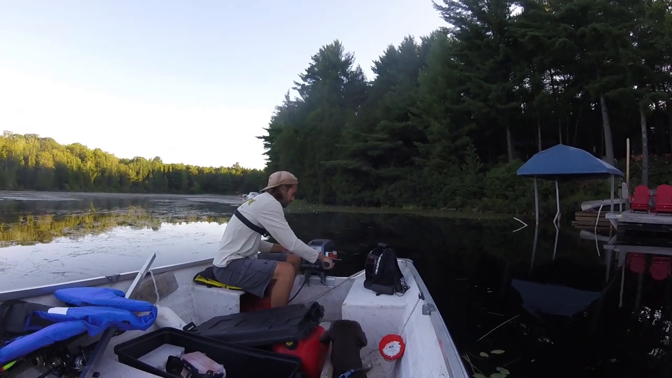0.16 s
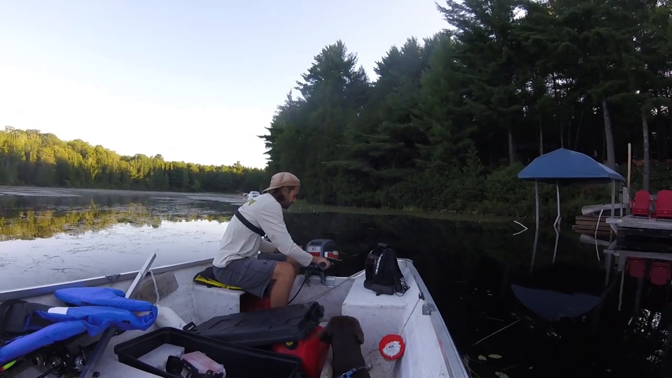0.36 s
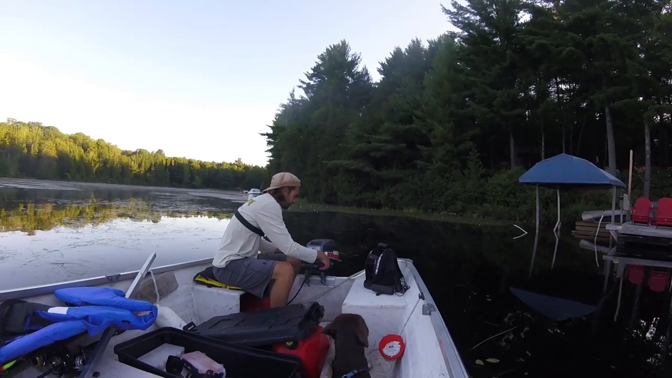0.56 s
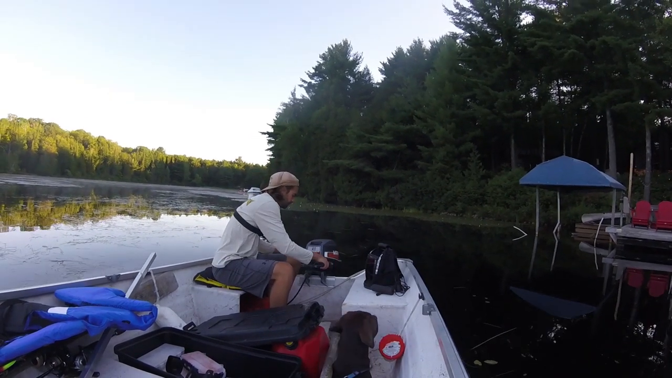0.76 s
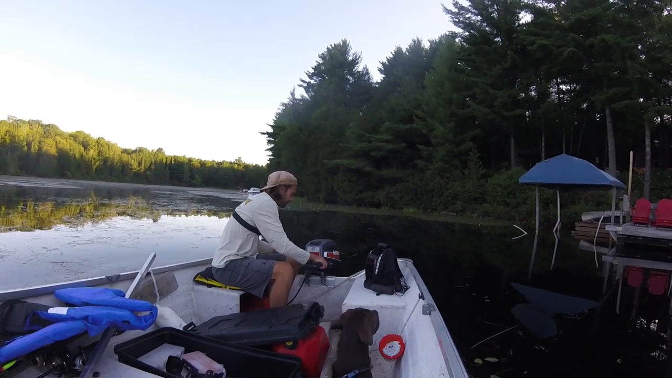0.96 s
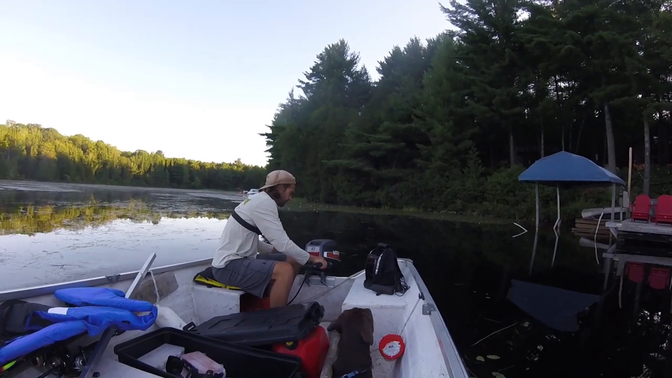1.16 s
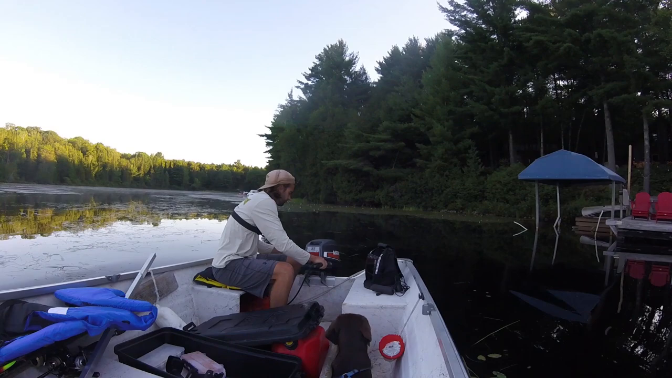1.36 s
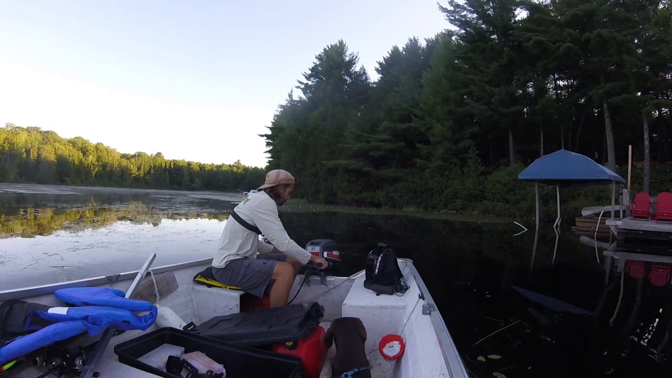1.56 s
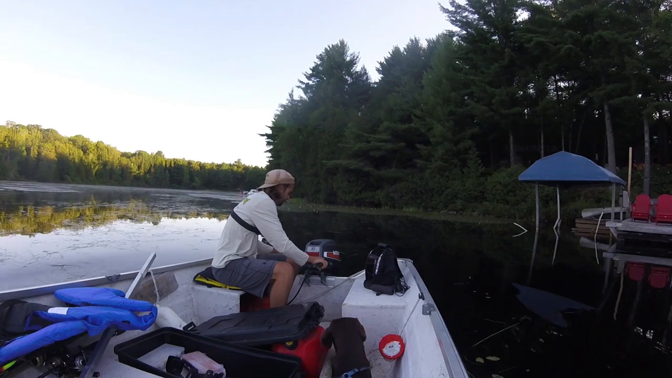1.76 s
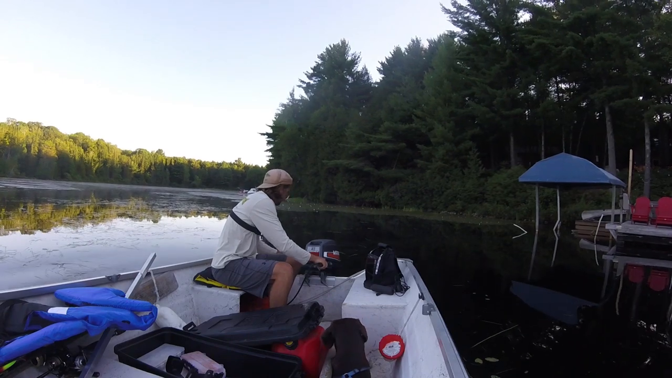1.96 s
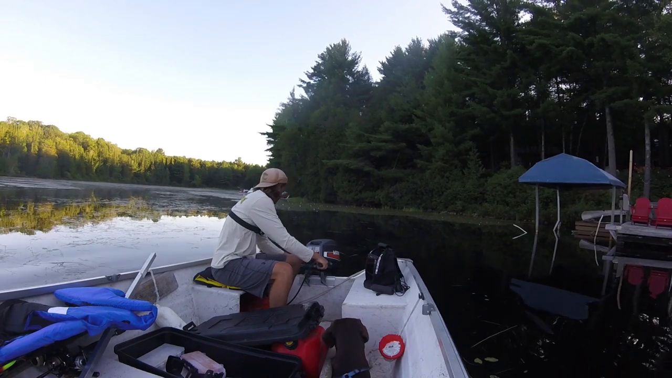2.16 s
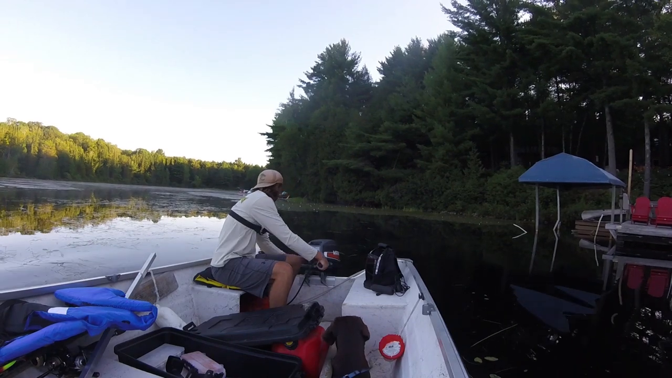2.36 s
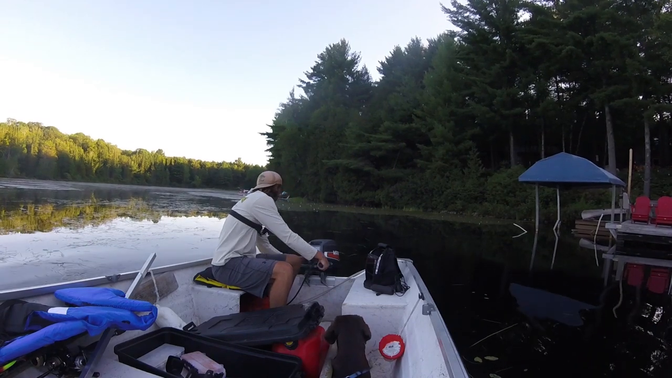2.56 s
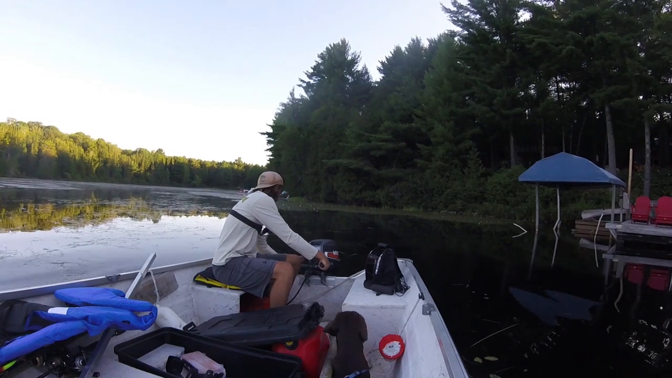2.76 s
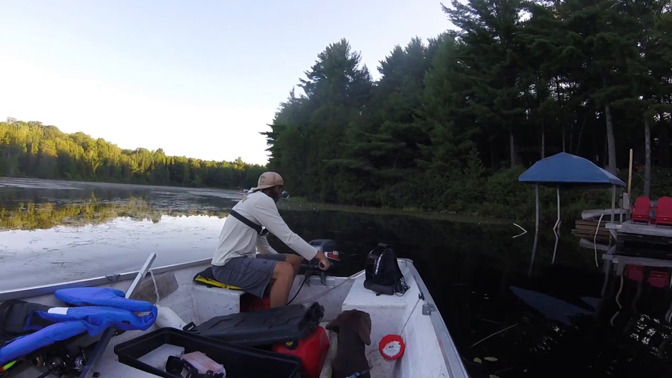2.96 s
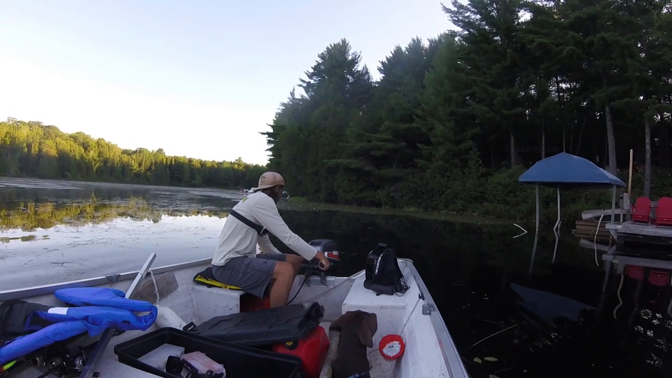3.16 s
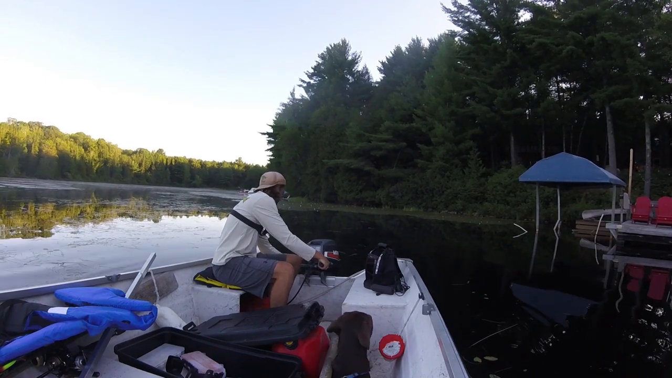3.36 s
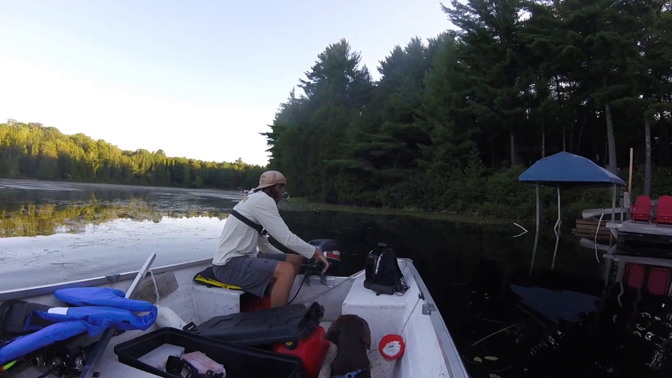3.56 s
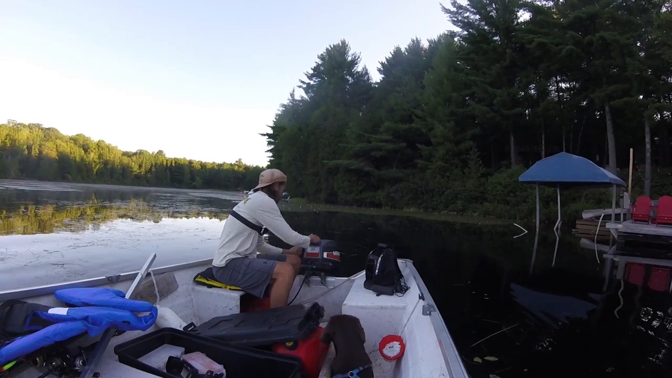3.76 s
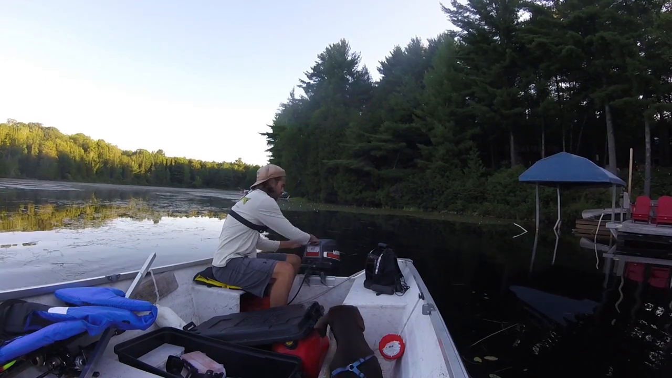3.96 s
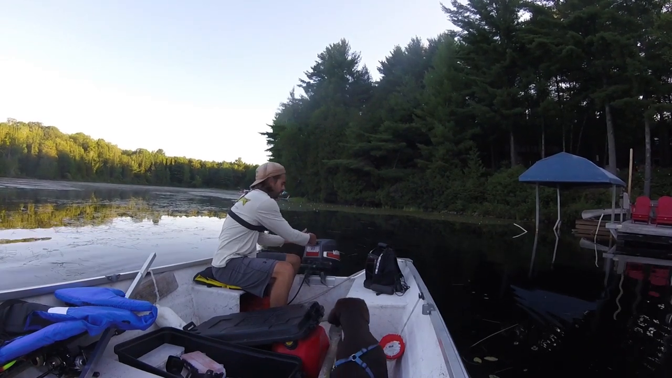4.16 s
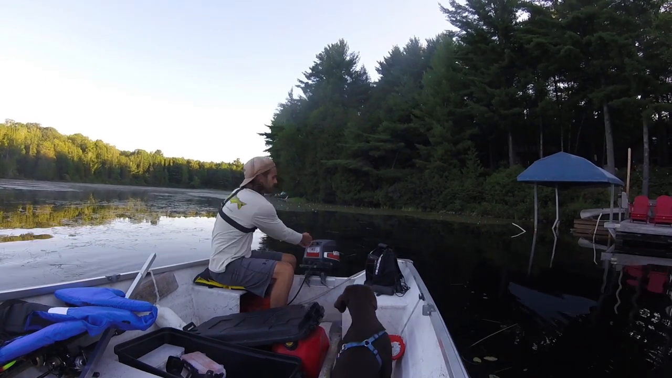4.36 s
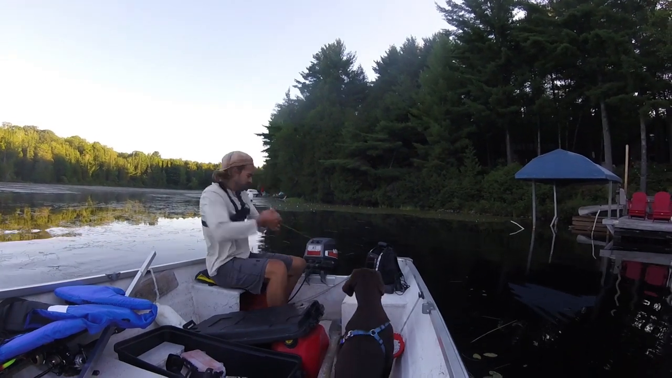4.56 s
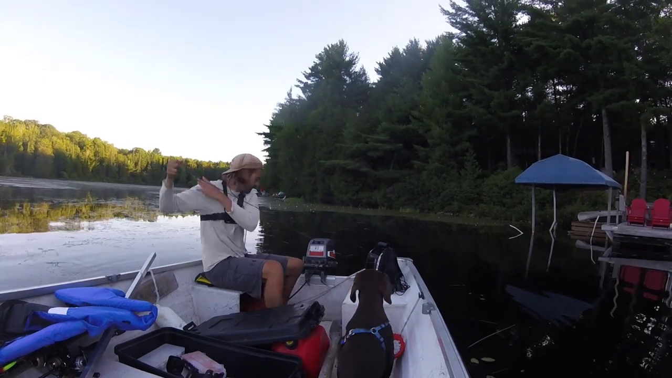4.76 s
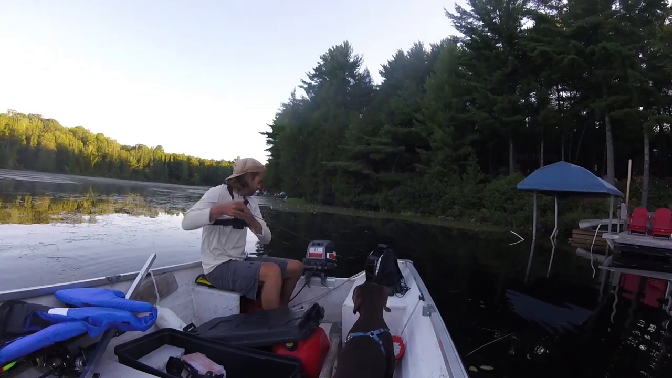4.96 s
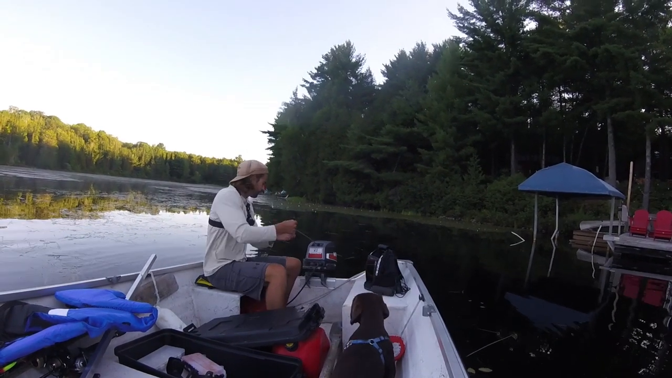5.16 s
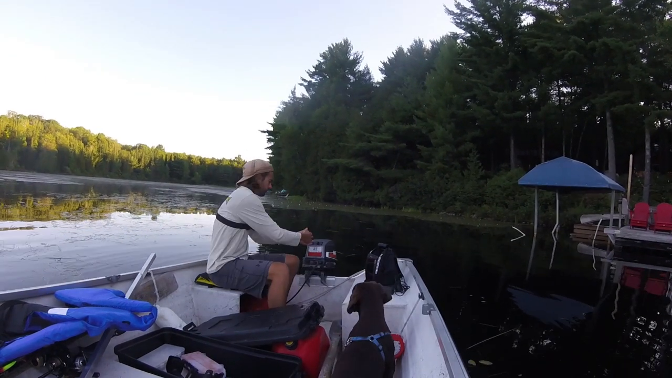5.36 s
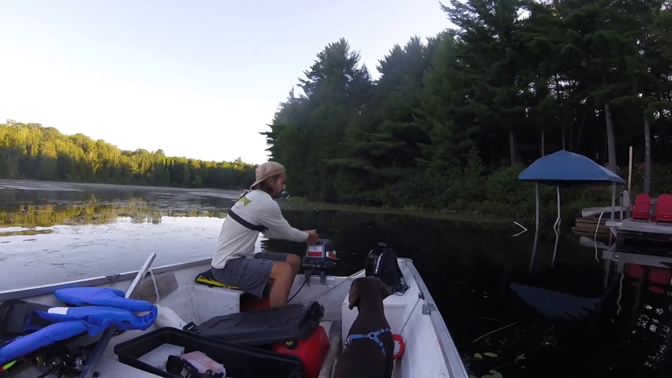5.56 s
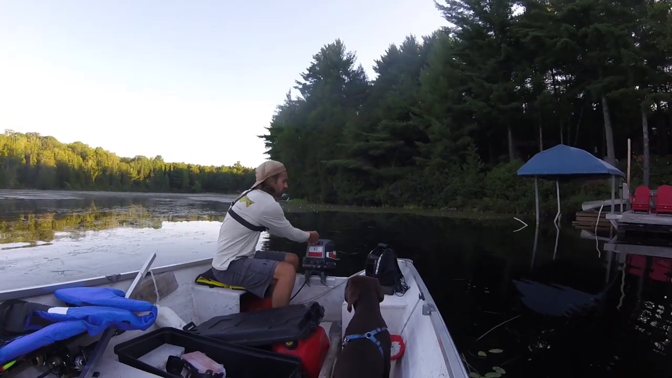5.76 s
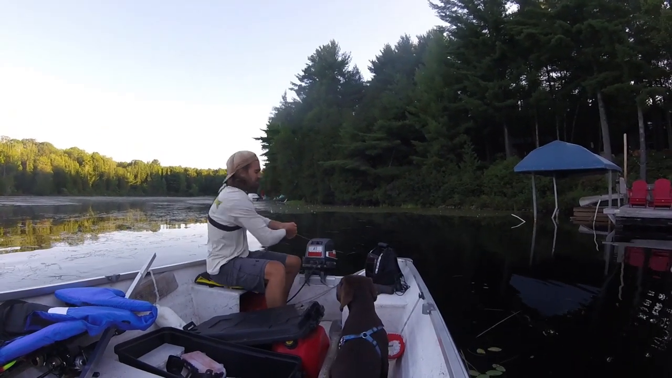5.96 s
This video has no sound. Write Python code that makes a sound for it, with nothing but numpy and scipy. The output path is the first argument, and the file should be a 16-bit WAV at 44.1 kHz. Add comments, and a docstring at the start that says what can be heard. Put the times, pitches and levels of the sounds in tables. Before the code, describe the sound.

Handling of a small outboard in an aluminium boat: a metallic knock, quiet pauses with soft ticks, a burst of crisp clacks, scuffs and low thumps. Then one fierce cord pull, ratcheting and rasping, with hollow engine gasps fading within half a second. Light rattles and closing knocks follow. The water barely murmurs; the housed microphone has thin bass, muted extreme top and steady soft hiss.

```python
"""A small outboard on an aluminium boat: knocks on motor and hull, noise and sines ringing in metal modes.
The cord is drawn out, then yanked: rasp of coloured clicks, gliding squeak, starter clatter, flywheel whirr.
The engine wheezes in uneven puffs, as paired intake tones, and stops; the cord winds back.
Scuffs, rattles and thuds are resonant noise, a loose part chimes as a thin sine, the calm lake murmurs.
A boxed-in microphone on the bow hears it with less deep bass, a cut top and its own hiss."""
import sys
import numpy as np
from scipy import signal
from scipy.fft import rfft, irfft
from scipy.io import wavfile
from scipy.ndimage import uniform_filter1d

SR = 44100
rng = np.random.default_rng(int(sys.argv[2]) if len(sys.argv) > 2 else 0)


def wav_out(sig):
    """Save sig, one row per channel (or a flat mono array), as 16-bit PCM at SR to the path in sys.argv[1]."""
    wavfile.write(sys.argv[1], SR, np.round(np.clip(np.atleast_2d(sig).T, -1, 1) * 32767).astype(np.int16))


N = 269010
T = np.arange(N) / SR

# cord, starter and shifting weight, as breakpoints: time_s, rasp_db, rumble_db
WORK_LEVELS = [(0.0, -52.5, -55), (.2, -51, -56), (.3, -58, -47.5), (.42, -64.5, -63), (1.7, -64.5, -64),
               (2.77, -61.5, -59), (3.57, -64.5, -59.5), (3.97, -55, -56), (4.2, -53.5, -49),
               (4.4, -46, -55.5), (4.54, -44.5, -44), (4.79, -31.5, -31.5), (5.03, -35, -34.5),
               (5.11, -43, -38.5), (5.4, -53, -50), (5.66, -49, -48.5), (5.86, -48.5, -55),
               (5.96, -43.5, -46), (6.1, -48.5, -42)]


def undb(db):
    """Decibels to amplitude."""
    return 10 ** (np.asarray(db) / 20)


def unit(x):
    """Scale to rms 1."""
    return x / np.sqrt(np.mean(x ** 2))


def colour(x, table):
    """Shape the spectrum of x by (Hz, dB) points joined on a log frequency axis; rms 1."""
    hz, db = np.transpose(table)
    bin_hz = np.maximum(np.arange(N // 2 + 1) * SR / N, 1)
    gain = undb(np.interp(np.log(bin_hz), np.log(hz), db))
    return unit(irfft(rfft(x) * gain, N))


def walk(rate):
    """Random levels held 1 / rate s and slewed twice; rms 1."""
    hold = int(SR / rate)
    steps = np.repeat(rng.standard_normal(N // hold + 1), hold)
    slewed = uniform_filter1d(uniform_filter1d(steps, hold), hold)
    return unit(slewed[:N])


def grit(share, spread_db):
    """Noise in which a share of the samples are clicks of widely spread size."""
    clicks = rng.random(N) < share
    sizes = undb(spread_db * rng.exponential(size=N))
    return clicks * sizes * rng.standard_normal(N)


def swell(centre, half):
    """A smooth bump in time, zero beyond half a length either side of its centre (s)."""
    return np.cos(np.pi / 2 * np.clip((T - centre) / half, -1, 1)) ** 2


def ringing(hz, width, count):
    """Noise through one resonance applied twice, so its skirts are steep; rms 1."""
    b, a = signal.iirpeak(hz, hz / width, SR)
    once = signal.lfilter(b, a, rng.standard_normal(count))
    return unit(signal.lfilter(b, a, once))


def lake():
    """Water laps at the hull: a low noise murmur whose level stirs."""
    # murmur spectrum: freq_hz, relative_db
    murmur_spectrum = [(15, -47), (25, -9.5), (146, -0.5), (189, -3.5), (321, -3), (356, -3), (437, -4),
                       (1500, -22), (1950, -54), (3300, -120)]
    murmur = colour(rng.standard_normal(N), murmur_spectrum)
    return murmur * undb(-63.5 + 1.4 * walk(12))


def cord_rasp():
    """The cord rasps in slips: dense clicks of uneven size, coloured and flickering in level."""
    # rasp spectrum: freq_hz, relative_db
    rasp_spectrum = [(260, -12), (450, 0), (694, 1.5), (809, -1), (1460, -5.5), (1870, -5.5), (2600, -19.5),
                     (3380, -61), (5720, -120)]
    time_s, rasp_db, _ = np.transpose(WORK_LEVELS)
    level_db = np.interp(T, time_s, rasp_db) + 0.99 * walk(60)
    return colour(grit(0.3, 1.77), rasp_spectrum) * undb(level_db)


def hull_rumble():
    """The hull rumbles under the shifting weight: low noise with an unsteady level."""
    # rumble spectrum: freq_hz, relative_db
    rumble_spectrum = [(15, -48), (25, -11.5), (87, -9), (173, -7), (277, -4.5), (366, -7.5), (450, -12.5),
                       (580, -25), (990, -120)]
    time_s, _, rumble_db = np.transpose(WORK_LEVELS)
    level_db = np.interp(T, time_s, rumble_db) + 1.4 * walk(24.99)
    return colour(rng.standard_normal(N), rumble_spectrum) * undb(level_db)


def flywheel_whirr():
    """The flywheel whirrs with the cord: bright sparse clicks on the rasp's level curve."""
    lead_s, below_rasp_db, surge_db = 0.025, -12.5, 3
    spectrum = [(1500, -2.5), (2600, 5.0), (4800, 0.5), (6500, -2.5), (11000, -8.5), (13000, -55)]
    time_s, rasp_db, _ = np.transpose(WORK_LEVELS)
    # the level curve runs slightly ahead of the rasp, so the whirr fades a little sooner
    level_db = np.interp(T + lead_s, time_s, rasp_db) + below_rasp_db
    level_db = level_db + surge_db * swell(4.82, 0.23)  # at full speed
    return colour(grit(0.1, 1.3), spectrum) * undb(level_db + 2.0 * walk(80))


def loudest(x):
    """The highest short-term rms, over 5 ms."""
    return np.sqrt(uniform_filter1d(x ** 2, size=220).max())


def knocks():
    """Every blow strikes the same modes; loose parts chatter, so each mode rings rough and leaves a tail."""
    # knocks with their own ring time and a bright top, on the motor, the hull and in the starter:
    # start_s, clack_db, thump_db, tick_db, clack_pitch_hz, thump_pitch_hz,
    # ring_s (to -60 dB, before each register's share)
    bright_blows = [(0.0867, -20, -27.5, -30.5, 1340, 430, 0.033),
                    (.1228, -28, -33.5, -42.5, 1440, 400, 0.038), (.141, -41, -44, -58, 1260, 471, .031),
                    (0.18, -44, -48, -54, 1200, 183, .032), (0.1892, -40, -43, -43.5, 980, 293, .04),
                    (0.1952, -26.5, -32.5, -47, 1420, 220, 0.044), (0.206, -40, -30, -55, 1480, 326, 0.027),
                    (.227, -46, -39, -54, 1590, 157, 0.078), (.3003, -42.5, -62, -56, 1560, 272, 0.043),
                    (0.6522, -49, -56, -68, 1740, 484, .048), (0.812, -46, -41.5, -64, 1300, 343, 0.043),
                    (0.8312, -54, -48, -68, 2500, 463, 0.057), (.839, -62, -45, -70, 1300, 170, .06),
                    (1.0605, -72, -56, -65, 1700, 261, 0.038), (1.385, -52.5, -72, -65, 1630, 296, .05),
                    (1.561, -58, -52.5, -58, 1500, 230, 0.057), (1.861, -64, -55, -63, 1930, 315, .045),
                    (2.1529, -49.5, -42.5, -64, 1600, 312, 0.094), (2.235, -52, -60, -65, 1000, 522, .034),
                    (2.4507, -56, -47, -67, 1940, 415, 0.022), (2.4612, -46.5, -38, -70, 930, 384, 0.064),
                    (2.6644, -43, -48, -66, 1590, 468, 0.047), (2.6756, -44, -54, -66, 1120, 358, 0.051),
                    (2.819, -36.5, -35.5, -58, 1120, 424, 0.062),
                    (2.8424, -25.5, -29.5, -63, 1200, 460, 0.05), (2.85, -21, -52, -38.5, 1440, 301, 0.042),
                    (2.8541, -20.5, -31.5, -34, 1710, 437, 0.015),
                    (2.8612, -29.5, -53, -52, 1070, 397, 0.056), (2.949, -47, -53, -67, 1130, 476, 0.042),
                    (3.2282, -33.5, -44, -54, 1270, 519, 0.13),
                    (3.267, -16.5, -29.5, -25, 2220, 490, 0.045),
                    (3.3503, -49.5, -61, -61, 1950, 240, .033), (3.3682, -45, -68, -57, 2150, 479, 0.029),
                    (3.6485, -49.5, -42.5, -64, 1240, 476, 0.064), (3.658, -62, -46.5, -70, 1240, 220, .05),
                    (3.725, -56, -46, -65, 1230, 220, 0.054), (3.749, -60, -44.5, -68, 1210, 510, 0.024),
                    (3.982, -45.5, -44, -65, 980, 423, 0.051), (4.0086, -45, -37, -67, 800, 268, .08),
                    (4.035, -60, -45, -70, 800, 420, 0.046), (4.0987, -46, -46, -53, 2140, 412, 0.089),
                    (4.1335, -29, -36.5, -43, 1240, 372, 0.063), (4.1496, -33, -26.5, -44, 920, 388, .076),
                    (4.157, -50, -32, -60, 1100, 175, 0.093), (4.2085, -60, -49, -68, 800, 304, .03),
                    (4.892, -37, -39, -45, 850, 380, 0.031), (4.9104, -26, -33, -36.5, 1730, 202, 0.037),
                    (4.9674, -29.5, -37, -56, 1000, 363, 0.045), (5.014, -32, -42, -63, 1850, 377, .038),
                    (5.074, -37, -35, -59, 1060, 296, 0.075), (5.0979, -33.5, -27.5, -36, 1200, 358, 0.07),
                    (5.1893, -38.5, -49, -53.5, 1060, 372, 0.073),
                    (5.3015, -36.5, -43, -67, 1140, 367, .036), (5.4201, -42.5, -42, -65, 1040, 520, 0.033),
                    (5.579, -54, -40.5, -70, 1870, 172, 0.038), (5.7182, -42.5, -55, -55, 1670, 363, 0.063),
                    (5.9618, -45, -49, -63, 1500, 339, 0.047), (5.9899, -35.5, -50, -59, 1940, 415, .03),
                    (6.0792, -34.5, -42, -52, 1100, 161, .031), (6.087, -34, -31.5, -56, 1470, 406, 0.023),
                    (6.0944, -26.5, -34, -41, 1230, 280, 0.12)]
    # starter clatter under the yank, short and dull on top: the same columns without ring_s
    dull_blows = [(4.5474, -46, -48, -52, 1950, 285), (4.5932, -29, -32.5, -53, 1560, 486),
                  (4.65, -35, -54, -59, 1460, 563), (4.6888, -13.5, -20.5, -18.5, 1660, 447),
                  (4.715, -27.5, -28.5, -40, 1110, 264), (4.76, -18.5, -25.5, -28, 2260, 404),
                  (4.7653, -18.5, -18.5, -42, 880, 247), (4.77, -41, -49, -30.5, 910, 345),
                  (4.8007, -32, -33, -40, 2800, 503), (4.821, -30, -23, -52, 1940, 467),
                  (4.8306, -14, -19, -23.5, 1000, 579), (4.8433, -32, -50, -25, 1250, 484),
                  (4.8517, -25.5, -51, -38, 910, 396), (4.8694, -20, -37, -29, 1970, 385)]
    # what motor and hull ring with, one list per register (thump, body, clack, tick, crack):
    # freq_hz, width_hz (of one resonance), relative_db
    mode_registers = [
        [(179, 72, -4), (245, 100, -3), (333, 62, -1), (379, 93, 0), (458, 175, 4.5), (518, 28, -6.5)],
        [(719, 79, 3), (855, 210, -5.5), (1049, 160, -2.5), (1238, 254, -1.5)],
        [(1541, 275, 1), (1850, 300, -1), (2080, 100, -6), (2315, 710, 1), (2623, 330, -4), (2956, 94, -4)],
        [(3443, 360, -2.5), (4010, 430, 2), (4453, 77, -2), (4920, 880, 3), (5340, 130, -5), (5850, 290, -23)],
        [(7340, 4500, 12.5), (9200, 4900, -10), (9400, 1800, -8), (11800, 1500, -29.5)],
    ]
    # per register, share of ring_s [ratio]: highs die first
    ring_share = [1.04, 1.01, 0.84, 0.52, 0.5]
    # per register, onset lag [s]: lows build up late
    onset_lag_s = [0.00515, 0.0009, 0.00027, 0.000225, 0.000067]
    clack_focus_db, thump_focus_db = 15.0, 25.0  # loss one octave or more from the struck spot's pitch
    tail_db, tail_stretch = -20, 3.36  # a quieter tail that falls this many times slower
    contact_s, soften, strike_gain = 0.00024, 0.096, 1.26  # contact and strike of a -27 dB clack
    body_db = 2.0
    bright_crack_db, dull_crack_db, dull_ring_s = -1, -20.5, 0.021
    crack_db_per_octave = -12  # the crack is stronger on low-pitched spots
    boom_db, boom_t60_s, boom_lag_s = -13.5, 0.16, 0.008  # the hull under each thump

    t = np.arange(8820) / SR
    count = N + len(t)
    out, boom = np.zeros(count), np.zeros(count)
    rings = [np.array([ringing(hz, width, count) for hz, width, _ in modes]) for modes in mode_registers]
    hull = ringing(120, 210, count)
    blows = [(*row, bright_crack_db) for row in bright_blows]
    blows += [(*row, dull_ring_s, dull_crack_db) for row in dull_blows]

    for start_s, clack_db, thump_db, tick_db, clack_hz, thump_hz, ring_s, crack_db in blows:
        now = slice(int(start_s * SR), int(start_s * SR) + len(t))
        softness = undb(-soften * (clack_db + 27.0))  # weak blows push longer and strike less
        parts = []
        for k, modes in enumerate(mode_registers):
            hz, width, db = np.transpose(modes)
            spot_hz, focus_db = (clack_hz, clack_focus_db) if k else (thump_hz, thump_focus_db)
            # modes near the pitch of the struck spot speak loudest
            octaves = abs(np.log2(hz / spot_hz))
            gain = undb(db - focus_db * np.minimum(octaves, 1))

            # rough ringing: each mode's noise under a rise, a fall and a tail
            fall_db = -60 * t / (ring_s * ring_share[k])
            rise = (1 - np.exp(-t / (onset_lag_s[k] + contact_s * softness))) ** 2
            fade = rise * (undb(fall_db) + undb(tail_db + fall_db / tail_stretch))
            rough = rings[k][:, now] * fade

            # clean ringing: decaying sines, neighbouring modes swinging in opposite senses
            late = np.maximum(t - onset_lag_s[k], 0)
            hz, width = hz[:, None], width[:, None]
            sign = (-1.) ** np.arange(len(hz))[:, None]
            attack = 1 - np.exp(-late * hz)
            tone = np.sin(2 * np.pi * hz * late) * np.exp(-np.pi * width * late)
            struck = sign * strike_gain / softness * attack * tone
            parts.append(gain @ (rough + struck * undb(fall_db)))

        thump, body, clack, tick, crack = parts
        top_db = crack_db + crack_db_per_octave * np.log2(clack_hz / 1400)
        layers = [(thump, thump_db), (undb(body_db) * body + clack, clack_db),
                  (tick, tick_db), (crack, tick_db + top_db)]
        for part, level_db in layers:
            out[now] += undb(level_db) * part / loudest(part)
        boom_shape = (1 - np.exp(-t / boom_lag_s)) * np.exp(-np.log(1000) * t / boom_t60_s)
        boom[now] += undb(thump_db + boom_db) * boom_shape

    # the knocks lose everything below about 130 Hz; the hull's boom is added afterwards
    bass_cut = signal.butter(4, 130, "highpass", fs=SR, output="sos")
    return signal.sosfilt(bass_cut, out[:N]) + (boom * hull)[:N]


def scuffs_rattles_thuds():
    """Scuffs, ringing rattles and low thuds: short swells of noise, each in one broad or narrow resonance."""
    # swells: centre_s, half_length_s, freq_hz, width_hz (of one resonance), level_db
    noise_swells = [(0.204, 0.019, 4970, 900, -47), (.235, .03, 2300, 830, -54),
                    (0.18, .006, 900, 1000, -42), (0.28, 0.14, 89, 90, -52),
                    (0.658, .02, 1600, 1400, -53.5), (0.825, 0.026, 1800, 1200, -53),
                    (1.576, 0.037, 250, 330, -55), (1.881, .042, 199, 310, -58),
                    (2.161, 0.018, 2200, 1400, -55), (2.669, 0.021, 1910, 1990, -45.5),
                    (2.947, 0.025, 1200, 1400, -50.5), (3.228, 0.0086, 1500, 1800, -43),
                    (3.68, 0.1, 1800, 2000, -52), (3.734, .03, 100, 100, -48),
                    (4.088, 0.023, 2900, 600, -46), (4.44, 0.087, 1080, 770, -45),
                    (5.019, 0.025, 1700, 270, -30), (5.308, 0.009, 1640, 270, -38.5),
                    (5.468, .04, 2300, 2200, -55.5), (5.663, .054, 1770, 350, -48.5),
                    (5.734, .04, 1740, 220, -52), (5.735, 0.063, 4400, 1400, -56),
                    (5.895, 0.084, 1150, 940, -47)]
    out = np.zeros(N)
    for centre, half, hz, width, db in noise_swells:
        level = undb(db + 1.34 * walk(150)) * swell(centre, half)
        out += level * ringing(hz, width, N)
    return out


def chime():
    """A loose part of the cowling chimes as it rocks to rest: one thin tone that comes and goes."""
    # swells of the chime: centre_s, half_length_s, level_db
    rocks = [(0.236, 0.016, -30.5), (0.259, .013, -44), (0.31, 0.024, -47), (.367, 0.014, -54.5)]
    level = sum(undb(db) * swell(centre, half) for centre, half, db in rocks)
    return np.sin(2 * np.pi * 1487 * T) * level


def squeak():
    """The cord squeaks in its guide as it speeds up: a breathy tone that rises steadily and trembles."""
    # squeaks: centre_s, half_length_s, pitch_hz (at the centre), rise_hz_per_s, level_db
    glides = [(4.39, .08, 769, 5000, -45), (5.685, 0.046, 1954, 10000, -52)]
    flutter = 1 + 0.4 * walk(120)
    tremble = 2 * np.pi * 0.046 * walk(200)  # phase, radians
    out = np.zeros(N)
    for centre, half, hz, rise, db in glides:
        since = T - centre
        phase = 2 * np.pi * (hz * since + rise * since ** 2 / 2)
        out += undb(db) * swell(centre, half) * np.sin(phase + tremble)
    return flutter * out


def pipe_tone(hz):
    """One wheezing intake resonance: a sine wavering in pitch and level."""
    pitch_hz = hz * (1 + 0.01187 * walk(30))
    return undb(1.5 * walk(70)) * np.sin(2 * np.pi * np.cumsum(pitch_hz) / SR)


def intake():
    """The engine gulps air: uneven puffs, each blowing the two pipe tones of the intake."""
    # puffs: centre_s (of the low tone), half_length_s (of the low tone), low_tone_db, high_tone_db
    puffs = [(4.764, 0.018, -36, -39), (4.824, 0.016, -42, -42), (4.902, 0.043, -33.5, -30.5),
             (4.987, 0.038, -27.5, -31), (5.054, 0.052, -32.5, -35.5), (5.129, 0.062, -28.5, -31),
             (5.23, 0.045, -23.5, -37.5), (5.34, 0.033, -27, -44)]
    # nominal pitches of the two pipe tones: low_hz, high_hz
    pipe_hz = (368, 722)
    low, high = [pipe_tone(hz) for hz in pipe_hz]
    out = np.zeros(N)
    for centre, half, low_db, high_db in puffs:
        out += undb(low_db) * swell(centre, half) * low
        # the upper tone peaks earlier, while the air is fastest
        out += undb(high_db) * swell(centre - 0.23 * half, 0.81 * half) * high
    return out


def scene():
    """Sum all the sources into one channel."""
    cord_and_motor = cord_rasp() + hull_rumble() + flywheel_whirr() + squeak() + intake()
    return (lake() + cord_and_motor + knocks() + scuffs_rattles_thuds() + chime())[None]


def record(dry):
    """The housing thins the deep bass, the preamplifier hisses, the top is cut."""
    hiss_spectrum = [(400, -12), (900, -2.0), (2200, -2), (6000, -4.0), (12800, -4.0), (13000, -42)]
    hiss = undb(-57.5) * colour(rng.standard_normal(N), hiss_spectrum)
    bass_cut = signal.butter(2, 45, "highpass", fs=SR, output="sos")
    top_cut = signal.ellip(10, 0.2, 70, 13800, fs=SR, output="sos")
    boxed = signal.sosfilt(bass_cut, dry)
    return signal.sosfilt(top_cut, boxed + hiss)


dry = scene()
out = record(dry)
wav_out(out)
```